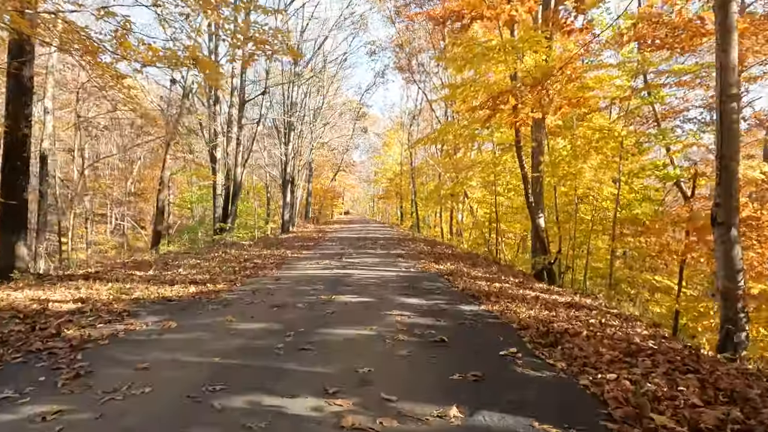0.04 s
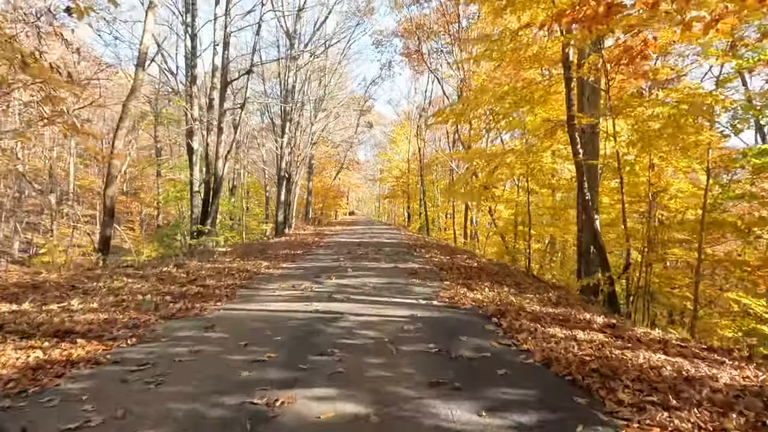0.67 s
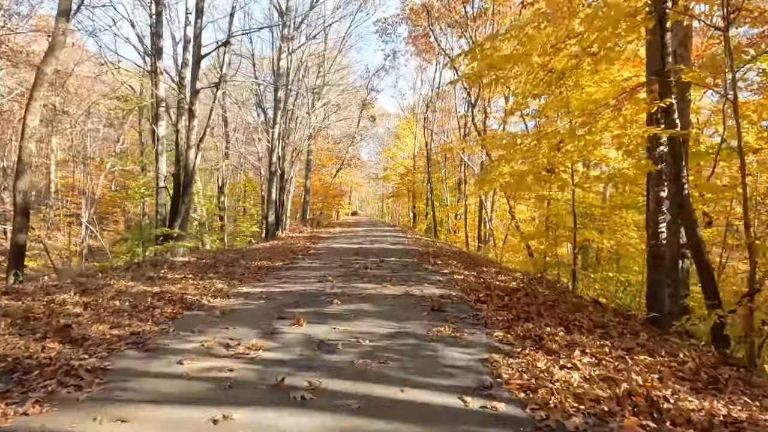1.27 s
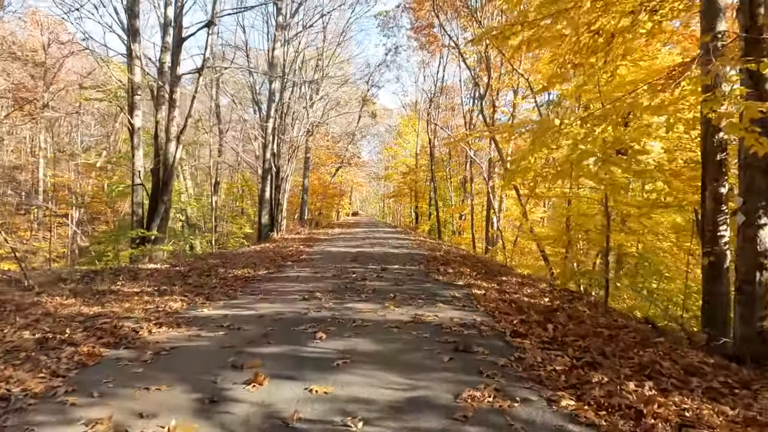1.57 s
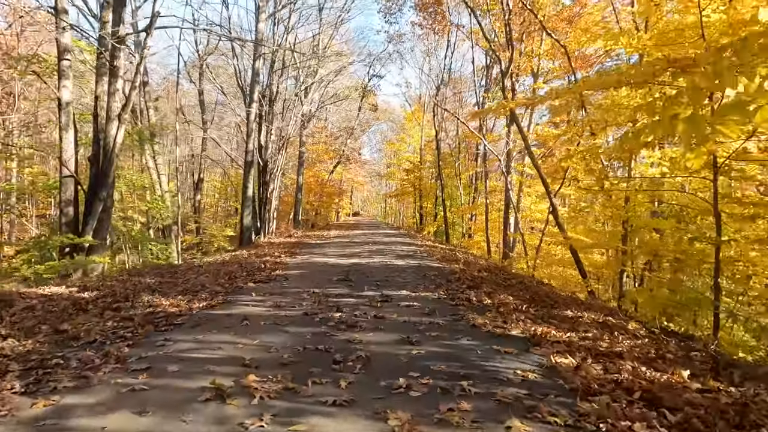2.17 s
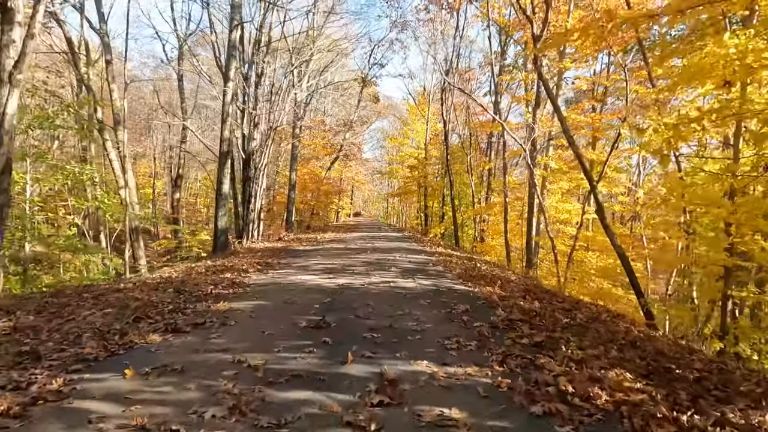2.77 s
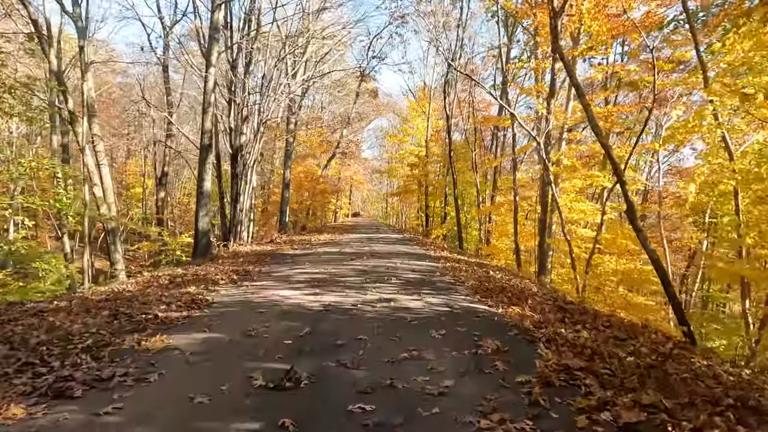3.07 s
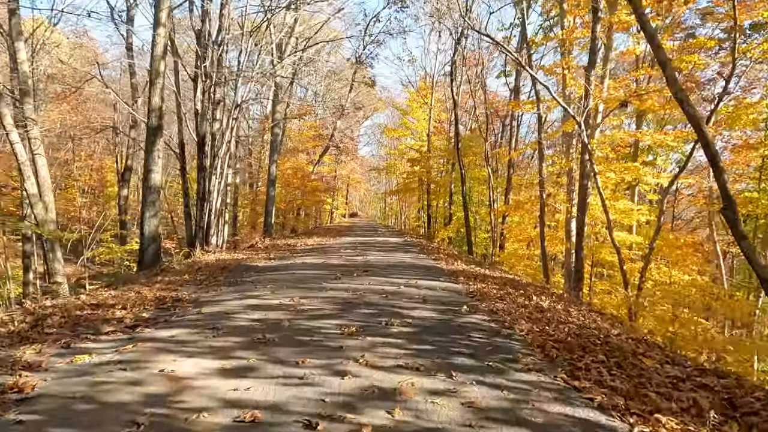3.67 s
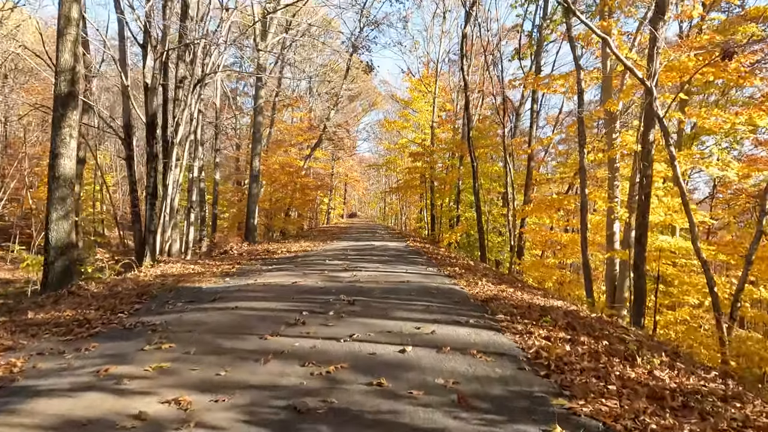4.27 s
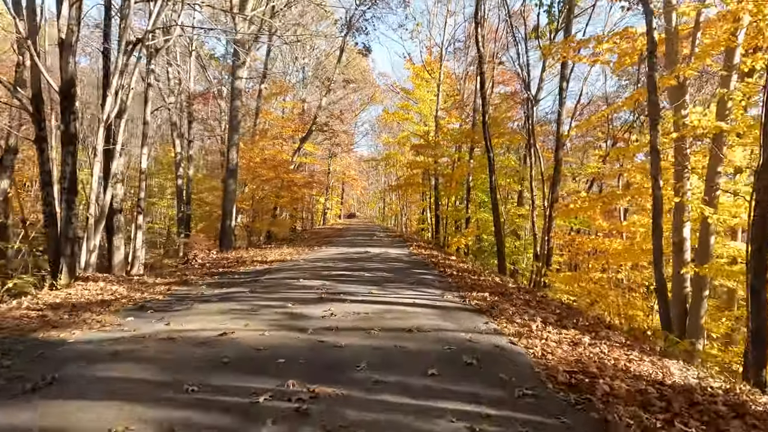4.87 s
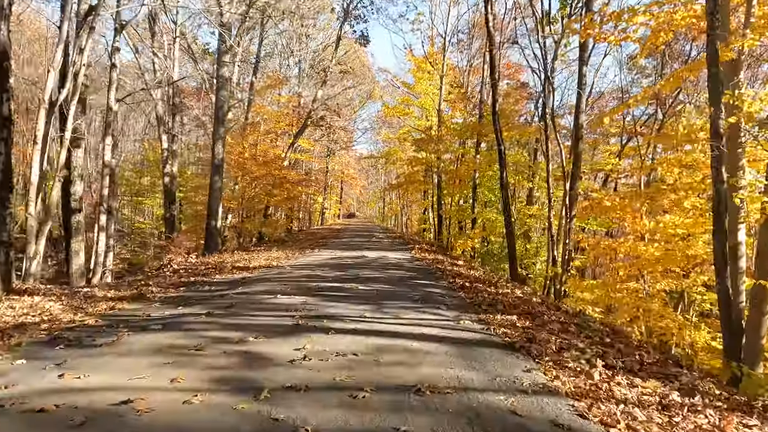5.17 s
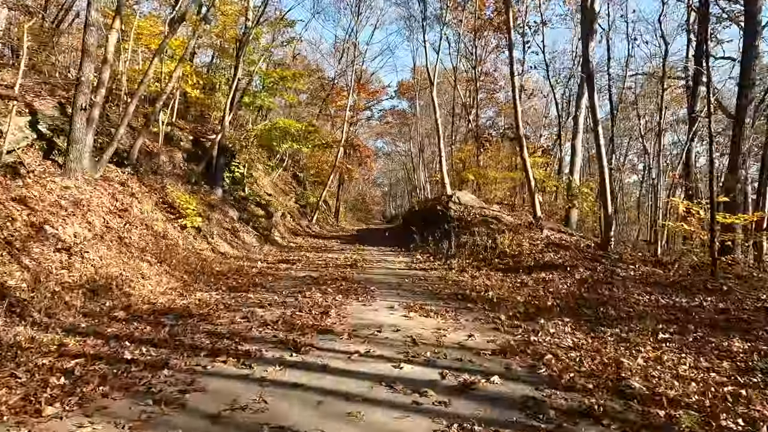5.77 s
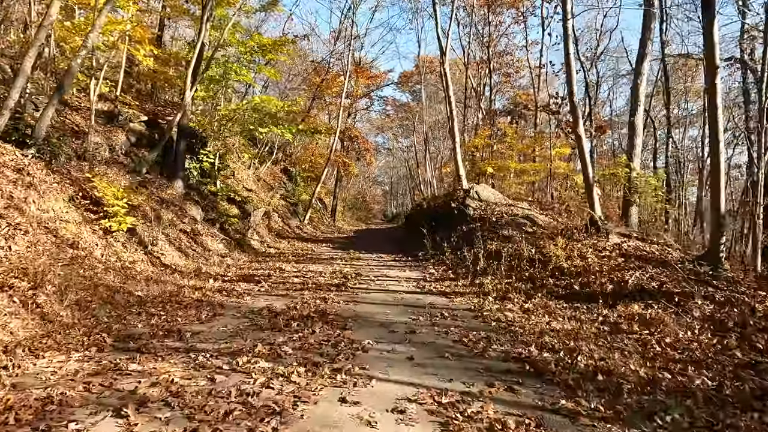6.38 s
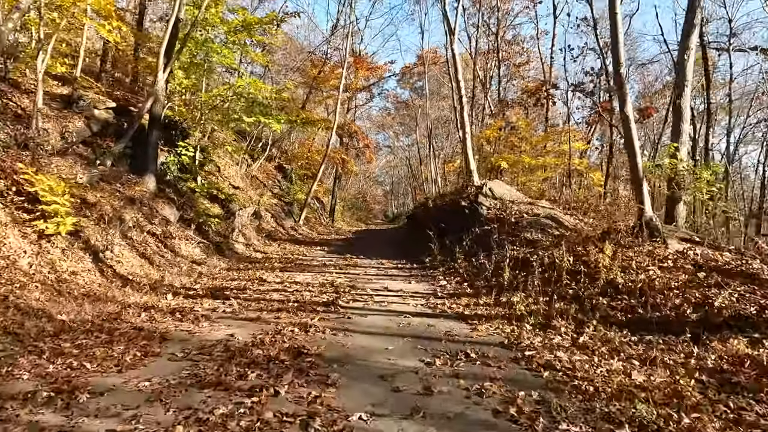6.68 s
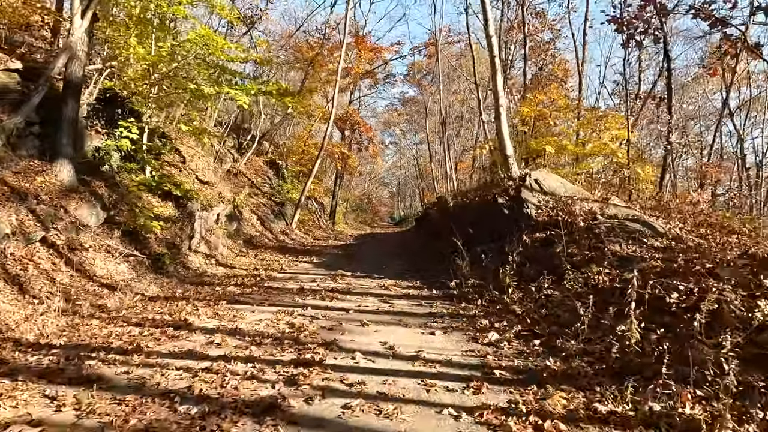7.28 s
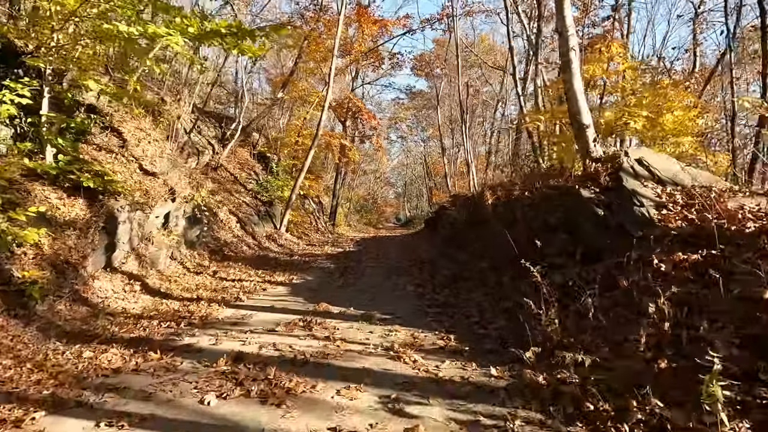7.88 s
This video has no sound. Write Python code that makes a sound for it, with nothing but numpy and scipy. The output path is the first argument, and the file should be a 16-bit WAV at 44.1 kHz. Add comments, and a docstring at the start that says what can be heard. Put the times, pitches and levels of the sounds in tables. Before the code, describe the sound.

A bicycle rides along a paved woodland trail, heard from a microphone on the bike. Low wind rumble and a droning frame run under the hum of the tyres, while dry leaves crackle and crunch, twigs snap and loose parts knock lightly. The crackling thickens midway. Near the end the sound switches with a tick to a sandy trail, with softer, deeper wind and thinner leaves.

```python
"""A bicycle sets off along a paved woodland trail strewn with dry leaves. From the start the tyres hum,
the frame drones with the road and wind buffets the microphone. Leaf litter crackles and fizzes under
the tread, single leaves collapse in short crunches, stems and grit snap, and loose parts knock.
Near 3.5 s the litter deepens. Near 5.8 s the sound switches with a tick to a sandy trail, where the
wind is weaker and deeper, the litter is thinner and the hum of the tyres swells twice."""
import sys
import numpy as np
from scipy import signal
from scipy.fft import rfft, irfft
from scipy.io import wavfile
from scipy.ndimage import uniform_filter1d, minimum_filter1d

SR = 44100
rng = np.random.default_rng(int(sys.argv[2]) if len(sys.argv) > 2 else 0)


def dump_mix(stems):
    """Bounce the given channels to the path in sys.argv[1] as a 16-bit WAV at rate SR."""
    frames = np.atleast_2d(stems).T  # one column per channel
    limited = np.clip(frames, -1, 1)  # hard clip at full scale
    pcm = np.round(limited * 32767).astype(np.int16)
    wavfile.write(sys.argv[1], SR, pcm)


N = 358974
TIME = np.arange(N) / SR
SAND_FROM_S = 5.7655
ON_SAND = TIME > SAND_FROM_S
CASING_HZ = 676   # resonance of the tyre casing

# tyre and frame resonances: (frequency [Hz], bandwidth [Hz], level [dB])
TYRE_MODES = [(346.7, 55, -46), (424, 48, -52), (517, 96, -52)]
# rough and smooth stretches of trail: (time [s], duration [s], rise of the drone [dB])
ROUGH_GROUND = [(0.0, 0.6, 4.5), (2.07, 0.33, 3.5), (2.76, 0.11, -6.5), (3.25, 0.038, 4.5), (4.3, 0.13, 4),
                (5.88, 0.55, 4), (6.54, 0.31, -1), (7.8, 0.18, 2.5)]
# swells of the tyre hum on sand: (time [s], duration [s], rise [dB])
HUM_SWELLS = [(5.76, 0.1, 5.5), (7.12, 0.58, 4)]
# large leaves crushed:
# (peak time [s], time constant [s], relative blade level [dB], pitch [Hz], relative edge level [dB])
LARGE_LEAVES = [(0.226, 0.019, -29, 2410, -44.5), (0.405, 0.016, -30, 1970, -54),
                (0.563, 0.0072, -26.5, 1910, -48), (0.621, 0.017, -26, 2350, -43),
                (0.82, 0.012, -49, 2010, -47), (0.951, 0.0073, -31, 2220, -60),
                (1.197, 0.018, -32, 2700, -56), (1.333, 0.011, -30.5, 2780, -62),
                (1.434, 0.014, -32, 2750, -51), (1.575, 0.0035, -26, 3400, -59),
                (1.946, 0.012, -33, 3300, -56), (1.992, 0.018, -27.5, 2970, -43),
                (2.101, 0.003, -36, 3300, -46), (2.179, 0.016, -24.5, 2950, -40.5),
                (2.327, 0.013, -31, 2260, -61), (2.559, 0.035, -27, 2630, -46),
                (2.718, 0.026, -28.5, 2360, -44.5), (2.8, 0.011, -30, 2380, -50),
                (3.181, 0.017, -21, 2160, -40.5), (3.364, 0.019, -17, 1890, -38.5),
                (3.427, 0.01, -23, 2400, -47), (3.566, 0.098, -29, 2100, -50),
                (3.719, 0.01, -24, 2300, -45.5), (3.917, 0.016, -27.5, 2490, -44),
                (4.17, 0.0044, -26, 2660, -42), (4.185, 0.002, -35, 3500, -41),
                (4.222, 0.037, -30, 2780, -53), (4.247, 0.0057, -22.5, 2880, -54),
                (4.294, 0.0098, -20.5, 2250, -42.5), (4.422, 0.018, -26.5, 2400, -41.5),
                (4.631, 0.036, -23.5, 2510, -53), (4.684, 0.019, -23.5, 2740, -58),
                (4.854, 0.052, -25.5, 3700, -58), (5.063, 0.042, -25, 2610, -72),
                (5.174, 0.01, -20, 2490, -45), (5.293, 0.0056, -19.5, 3340, -63),
                (5.433, 0.022, -29.5, 2500, -52), (5.611, 0.012, -23, 2500, -67),
                (5.704, 0.034, -28, 2880, -70), (5.758, 0.0047, -26, 2760, -54),
                (6.077, 0.02, -24, 2680, -46.5), (6.273, 0.058, -36, 3200, -56),
                (6.434, 0.015, -30, 2480, -49.5), (6.651, 0.024, -33, 2360, -46),
                (6.729, 0.025, -28.5, 2780, -46.5), (6.874, 0.016, -37, 2150, -49.5),
                (6.977, 0.02, -34, 2270, -52), (7.195, 0.018, -25.5, 2370, -44),
                (7.235, 0.01, -38, 3000, -44), (7.278, 0.044, -33.5, 2970, -53),
                (7.367, 0.024, -28.5, 1830, -47.5), (7.511, 0.004, -31, 3330, -41),
                (7.551, 0.022, -31, 3100, -54), (7.835, 0.027, -29.5, 2070, -46.5),
                (7.956, 0.0084, -27.5, 2500, -50), (8.066, 0.013, -31, 3000, -45),
                (8.098, 0.012, -23, 2870, -40)]
# depth of the litter on each trail, as the strength of its crackle: (time [s], relative level [dB])
PAVED_LITTER = [(0.0, -40), (0.4, -44), (0.91, -45), (1.41, -43.5), (1.91, -45.5), (2.18, -41.5),
                (3.12, -40), (3.29, -41.5), (3.47, -34), (3.78, -36.5), (3.96, -41), (4.1, -37),
                (4.83, -37), (5.26, -35), (5.5, -41), (5.76, -35.5)]
SANDY_LITTER = [(5.78, -44), (6.25, -47), (6.38, -51), (6.52, -45), (6.82, -50.5), (7.12, -46),
                (7.3, -44.5), (7.7, -44.5), (8.13, -40.5)]
# stems, grit and brittle leaves snapping: (time [s], peak level [dB], pitch [Hz], quality factor [1])
SNAPS = [(0.1609, -27, 1590, 1.1), (0.621, -15.5, 1910, 0.35), (0.678, -23, 3200, 1.3),
         (1.1925, -24, 2200, 0.8), (1.272, -22.5, 1900, 0.58), (1.335, -22.5, 2000, 0.8),
         (1.44, -20.5, 1900, 0.5), (1.5795, -16, 1640, 0.8), (1.795, -25.5, 3800, 2.5),
         (2.2701, -24.5, 1680, 3.7), (2.3212, -16, 1430, 0.56), (2.5589, -14, 2700, 2.9),
         (2.798, -18.5, 2230, 1.3), (3.1497, -24, 4200, 2.9), (3.166, -17.5, 2830, 1.5),
         (3.2138, -21, 2280, 1.5), (3.381, -16, 2600, 2.5), (3.4145, -24, 2930, 2), (3.722, -21, 1950, 2.2),
         (4.165, -27, 3220, 0.92), (4.2467, -19, 2920, 8.7), (4.2829, -21, 2060, 2.7),
         (4.2895, -20, 2070, 4.9), (4.3748, -22, 3400, 1.2), (4.6147, -21, 2270, 5),
         (4.6438, -14.5, 2750, 3), (4.6703, -16, 2940, 3), (4.7618, -18, 2670, 2.3),
         (5.1632, -23, 2000, 2.5), (5.2242, -21, 3800, 4.5), (5.2927, -16.5, 3180, 1.4),
         (5.428, -22, 2830, 1.1), (5.44, -16, 1900, 1), (5.459, -18, 2500, 0.54), (5.611, -18, 2450, 1.5),
         (5.7174, -23, 3780, 5.7), (5.9724, -25, 3380, 2.9), (6.3268, -25, 2990, 1.3),
         (6.9736, -24.5, 2300, 9.1), (7.1895, -17.5, 2100, 1.6), (7.2804, -20, 2880, 1.4)]
# knocks of the bicycle: (time [s], ring level [dB], pitch [Hz], 60 dB decay time [s], thud level [dB])
KNOCKS = [(0.066, -29.5, 1060, 0.037, -30), (0.358, -34, 1280, 0.033, -36), (0.376, -31, 1150, 0.088, -26),
          (0.4653, -35, 1000, 0.022, -28), (0.541, -24.5, 1440, 0.0094, -39),
          (1.585, -26, 1300, 0.021, -34), (1.602, -33, 1430, 0.04, -42), (1.624, -36, 1450, 0.03, -48),
          (3.378, -32, 890, 0.015, -42), (5.255, -31, 995, 0.023, -37)]
# gusts and lulls: (time [s], duration [s], rise [dB])
GUSTS = [(0.5, 0.44, 0.5), (3.55, 0.19, 4), (5.3, 0.89, 1), (6.3, 0.14, -3), (7.76, 0.21, 5.5)]
# spectral densities of the noise sources: (frequency [Hz], relative level [dB])
TREAD_SPECTRUM = [(150, -7.5), (450, 4), (620, -0.5), (780, -0.5), (900, -1), (1300, -0.5), (1800, -4),
                  (2200, -26.5), (4000, -25), (7500, -19.5), (9000, -42.5), (14000, -100)]
CRACKLE_SPECTRUM = [(400, -12.5), (900, -8.5), (1300, -0.5), (2000, -3.5), (2950, 1), (3450, -1.5),
                    (3950, 0.5), (4700, -9.5), (6000, -16.5), (7600, -27.5), (9000, -48.5), (14000, -67)]
FIZZ_SPECTRUM = [(2000, -21), (4100, 4.5), (5200, 2.5), (6300, -0.5), (7400, -1.5), (8300, -13.5),
                 (9600, -12.5), (12000, -24.5), (15000, -56.5)]
WIND_SPECTRUM = [(10, -9.5), (20, 3), (36, -2), (62, -5), (90, -4.5), (120, -7), (170, -17), (400, -35.5),
                 (1200, -97)]
DRONE_SPECTRUM = [(70, -19), (130, 0), (170, 2), (218, 3), (255, -4.5), (310, -12.5), (400, -21.5),
                  (520, -31.5), (1200, -65)]


def tyres(tread_db=-45, casing_db=-51, sand_db=-2.0, uneven_db=2.0, waver_db=2.4, jolt_share=0.12):
    """Forced vibration: tread slap roars and drives hum and casing modes; sand muffles roar and casing."""
    grip = from_db(uneven_db * drift(48))
    road = grip * rng.standard_normal(N)
    hum = sum((-1) ** k * from_db(db) * unit_power(steep_resonance(road, hz, width))
              for k, (hz, width, db) in enumerate(TYRE_MODES))
    hum *= from_db(swells(HUM_SWELLS))
    casing = unit_power(steep_resonance(road, CASING_HZ, width_hz=60))
    casing *= from_db(casing_db + sand_db * ON_SAND + waver_db * drift(9))
    roar = grip * coloured(rng.standard_normal(N), TREAD_SPECTRUM)
    roar *= from_db(tread_db + sand_db * ON_SAND)
    return from_db(jolt_share * swells(ROUGH_GROUND)) * (hum - casing) + roar


def crunches(leaves, blade_gain_db=-6.0, edge_gain_db=2.0, rib_db=-8.0, rib_hz=1200, usual_edge_db=-11):
    """Cascading fracture: a collapsing leaf rings in its blade, lower in its ribs, high at its edges."""
    breaks, splinters = fractures(3000, spread_db=1.5), fractures(5000, spread_db=4.5)
    ribs = steep_resonance(fractures(3000, spread_db=2.0), rib_hz, 1.07 * rib_hz)
    blades, edges = np.zeros(N), np.zeros(N)
    for s, tau_s, blade_db, hz, edge_db in leaves:
        near = slice(max(0, int((s - .15) * SR)), int((s + .15) * SR))
        age = np.clip((TIME[near] - s) / tau_s, -20, 20)
        press = np.exp(np.minimum(age, -1.01 * age))   # builds up to the collapse, then dies away
        # a limp leaf pops with a clearer pitch than a brittle one
        brittleness_db = edge_db - blade_db - usual_edge_db
        width_hz = 0.9 * hz * from_db(0.21 * brittleness_db)
        blade = unit_power(steep_resonance(breaks[near], hz, width_hz))
        rib = from_db(rib_db) * unit_power(ribs[near])
        blades[near] += from_db(blade_db + blade_gain_db) * press * (blade + rib)
        edges[near] += from_db(edge_db + edge_gain_db) * press * unit_power(splinters[near])
    return lowpass(blades, 4300, order=5) + coloured(edges, FIZZ_SPECTRUM)


def small_leaves(crackle_db, fizz_db, per_s=9, spread_db=4.0):
    """Random scatter: rows like LARGE_LEAVES for small leaves, louder where the litter is deep."""
    count = int(per_s * N / SR)
    at = ((np.arange(count) + rng.random(count)) * N / count).astype(int)
    size, strength, pitch, dryness = rng.uniform(-0.72, 1, (count, 4)).T
    tau_s = 0.0024 * from_db(spread_db * size)
    blade_db = crackle_db[at] + 0.5 + spread_db * strength
    hz = 2540 * np.exp(0.12 * pitch)
    edge_db = fizz_db[at] + 2.5 + spread_db * dryness
    return list(zip(TIME[at], tau_s, blade_db, hz, edge_db))


def litter(crackle_db, fizz_db, crackle_gain_db=-2.0, clump_db=2.0, chip_db=-10.0):
    """Shot noise: countless breaks under the tread merge into clumps of crackle, fizz and bright chips."""
    clumps_db = clump_db * drift(39)
    grains = coloured(fractures(3500, spread_db=2.7), CRACKLE_SPECTRUM) + .5 * scraps()
    crackle = from_db(crackle_db + crackle_gain_db + clumps_db) * grains
    chips = unit_power(steep_resonance(fractures(62, spread_db=6.5), hz=5000, width_hz=1900))
    fizz = coloured(fractures(9000, spread_db=-0.5), FIZZ_SPECTRUM) + from_db(chip_db) * chips
    fizz = lowpass(fizz, 10400, order=8)   # litter is duller than the edges of a whole leaf
    return crackle + from_db(fizz_db + clumps_db) * fizz


def scraps(per_band_per_s=11, life_s=0.0035, low_hz=1400, high_hz=4000, bands=7):
    """Damped resonance: scraps crumble in brief bursts, each at a pitch set by its size; unit power."""
    out = np.zeros(N)
    for hz in np.geomspace(low_hz, high_hz, bands):
        starts = fractures(per_band_per_s, spread_db=-0.5) ** 2
        power = signal.lfilter([1], [1, -np.exp(-1 / (life_s * SR))], starts + 1e-18)
        bursts = np.sqrt(power) * rng.standard_normal(N)
        out += unit_power(steep_resonance(bursts, hz, 0.36 * hz))
    return unit_power(lowpass(out, 1.29 * high_hz, order=6))


def snaps(reach_hz=2500, splinter_db=-18, splinter_s=0.0048, size=1024):
    """Brittle fracture: one impulse and a few ms of splintering excite the broken piece's resonance."""
    out = np.zeros(N + size)
    for s, db, hz, q in SNAPS:
        splinters = from_db(splinter_db) * rng.standard_normal(size) * np.exp(-TIME[:size] / splinter_s)
        crack = signal.unit_impulse(size) + splinters
        snap = lowpass(resonance(crack, hz, hz / q), hz + reach_hz, order=6)
        at = int(s * SR)
        out[at:at + size] += from_db(db) * unit_peak(snap)
    return out[:N]


def knocks(contact_s=0.0025, rattle_db=-12, size=8192):
    """Impact excitation: a rough contact thuds in the casing and sets a loose part ringing and rattling."""
    out, age = np.zeros(N + size), TIME[:size]
    for s, db, hz, t60, thud_db in KNOCKS:
        contact = lowpass(rng.standard_normal(size) * np.exp(-age / contact_s), 2200, order=3)
        ring = unit_peak(resonance(contact, hz, width_hz=np.log(1000) / (np.pi * t60)))
        thud = unit_peak(resonance(contact, CASING_HZ, width_hz=75))
        rattle = unit_power(steep_resonance(rng.standard_normal(size), hz, .5 * hz))
        rattle *= from_db(rattle_db) * np.exp(-age / (0.76 * t60))
        at = int(s * SR)
        out[at:at + size] += from_db(db) * (ring + rattle) + from_db(thud_db) * thud
    return out[:N]


def wind(level_db=-18.5, sand_db=-3, waver_db=0.5, sand_speed=0.86):
    """Turbulence: eddies buffet the microphone, weaker and deeper at the lower riding speed on sand."""
    buffet_db = level_db + sand_db * ON_SAND + swells(GUSTS) + waver_db * drift(3.6)
    air = rng.standard_normal(N)
    slow_spectrum = [(hz * sand_speed, db) for hz, db in WIND_SPECTRUM]
    eddies = np.where(ON_SAND, coloured(air, slow_spectrum), coloured(air, WIND_SPECTRUM))
    return from_db(buffet_db) * lowpass(eddies, 900, order=4)


def frame_drone(level_db=-27, jolt_db=2.5):
    """Structure-borne sound: road shake passes through frame and mount, stronger on rough ground."""
    drone_db = level_db + swells(ROUGH_GROUND) + jolt_db * drift(25)
    return from_db(drone_db) * coloured(rng.standard_normal(N), DRONE_SPECTRUM)


def trail_change_tick(level_db=-16, decay_s=0.0012):
    """Step transient: a sudden jump in the sound is heard as one dry tick as the sandy trail begins."""
    return from_db(level_db) * ON_SAND * np.exp(-np.abs(TIME - SAND_FROM_S) / decay_s)


def fractures(per_s, spread_db):
    """Poisson process: tiny breaks of random time, sign and size; unit power."""
    sizes = from_db(spread_db * np.minimum(rng.exponential(1, N), 4))
    return unit_power(sizes * rng.choice([-1, 1], N) * (rng.random(N) < per_s / SR))


def swells(rows, attack_s=0.01, release_s=0.1):
    """Trapezoidal envelopes: each row rises, holds and falls; their sum in dB."""
    return sum(db * np.clip(np.minimum((TIME - s) / attack_s, 1 - (TIME - s - hold_s) / release_s), 0, 1)
               for s, hold_s, db in rows)


def drift(rate_hz):
    """Random modulation: smooth noise of unit power, mostly below rate_hz."""
    hz = np.fft.rfftfreq(N, 1 / SR)
    return unit_power(irfft(rfft(rng.standard_normal(N)) / (1 + (hz / rate_hz) ** 2), N))


def coloured(x, spectrum, size=16384):
    """Spectral shaping by a causal filter; white input keeps its power."""
    hz, db = np.transpose(spectrum)
    log_hz = np.log(np.fft.rfftfreq(size, 1 / SR) + 1)
    gain = unit_power(from_db(np.interp(log_hz, np.log(hz), db)))
    cepstrum = irfft(np.log(gain))[:size // 2]
    cepstrum[1:] *= 2   # minimum phase: nothing sounds early
    impulse_response = irfft(np.exp(rfft(cepstrum, size)))
    return signal.fftconvolve(x, impulse_response)[:len(x)]


def resonance(x, hz, width_hz):
    """Damped oscillator: two poles, with gain 1 at the peak."""
    r = np.exp(-np.pi * width_hz / SR)
    feedback = [1, -2 * r * np.cos(2 * np.pi * hz / SR), r * r]
    return signal.lfilter(np.array([1, 0, -1]) * (1 - r * r) / 2, feedback, x)


def steep_resonance(x, hz, width_hz):
    """Two resonators in cascade: the same bandwidth, steeper skirts."""
    wider = width_hz / np.sqrt(np.sqrt(2) - 1)
    return resonance(resonance(x, hz, wider), hz, wider)


def lowpass(x, hz, order):
    """Maximally flat low-pass filter."""
    return signal.sosfilt(signal.butter(order, min(hz, .49 * SR), fs=SR, output="sos"), x + 1e-18)


def limiter(x, ceiling, reach=SR // 100):
    """Peak limiting: the gain dips smoothly around each swing that would pass the ceiling."""
    gain = minimum_filter1d(np.minimum(1, ceiling / (np.abs(x) + 1e-9)), 2 * reach)
    return x * uniform_filter1d(uniform_filter1d(gain, reach), reach)


def from_db(db):
    """Decibels to amplitude ratio."""
    return 10 ** (np.asarray(db) / 20)


def unit_power(x):
    """Normalisation to a mean square of 1."""
    return x / np.sqrt(np.mean(x ** 2) + 1e-20)


def unit_peak(x):
    """Normalisation to a peak of 1."""
    return x / np.abs(x).max()


def scene(usual_litter_db=-39, usual_fizz_db=-56, fizz_follows=0.57, sand_fizz_db=1.7):
    """Superposition of close sources in open air; litter depth drives crackle, fizz and small leaves."""
    paved_db = np.interp(TIME, *np.transpose(PAVED_LITTER))
    sandy_db = np.interp(TIME, *np.transpose(SANDY_LITTER))
    crackle_db = np.where(ON_SAND, sandy_db, paved_db)
    fizz_db = usual_fizz_db + fizz_follows * (crackle_db - usual_litter_db) + sand_fizz_db * ON_SAND
    leaves = litter(crackle_db, fizz_db)
    leaves += crunches(small_leaves(crackle_db, fizz_db) + LARGE_LEAVES) + snaps()
    rumble = limiter(wind() + frame_drone(), ceiling=0.27)
    ride = lowpass(tyres() + leaves + knocks() + rumble, 12400, order=10)
    return (ride + trail_change_tick())[None]


def record(dry):
    """Band limiting: the treble is cut steeply above 16 kHz."""
    return lowpass(dry, 16000, order=20)


dry = scene()
out = record(dry)
dump_mix(out)
```